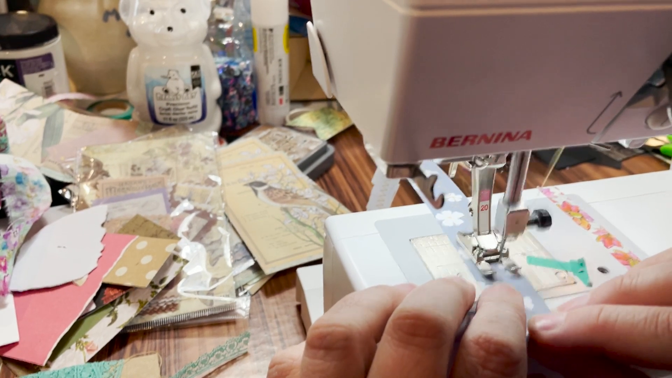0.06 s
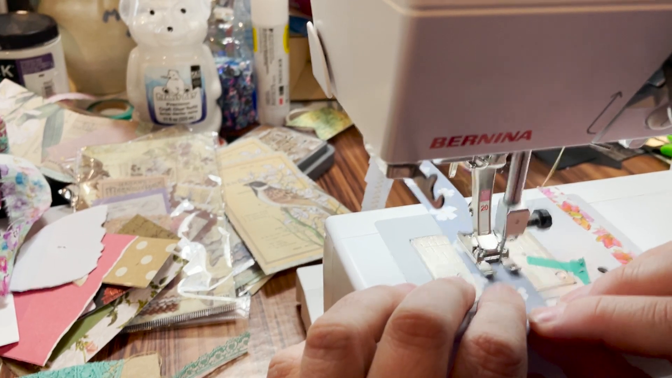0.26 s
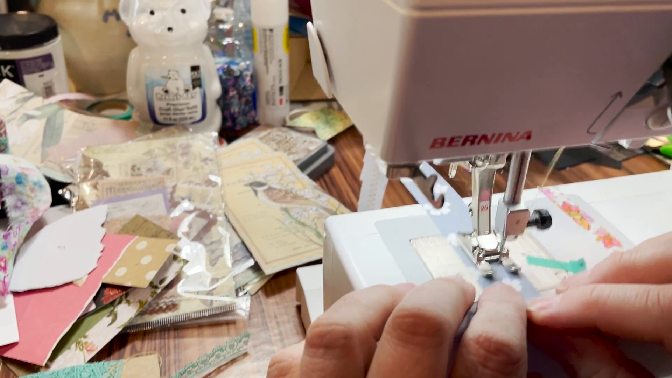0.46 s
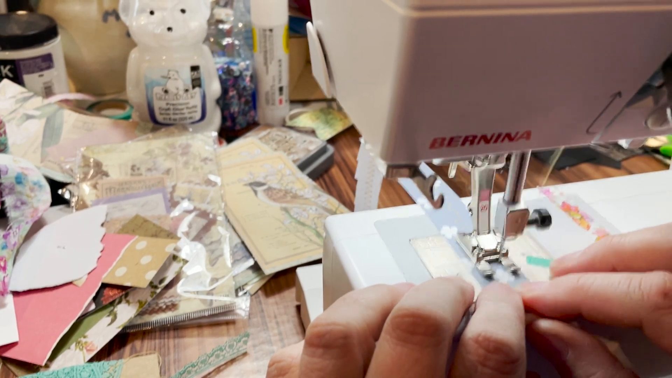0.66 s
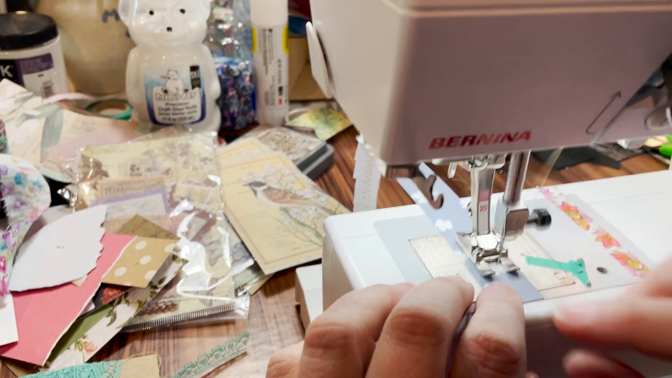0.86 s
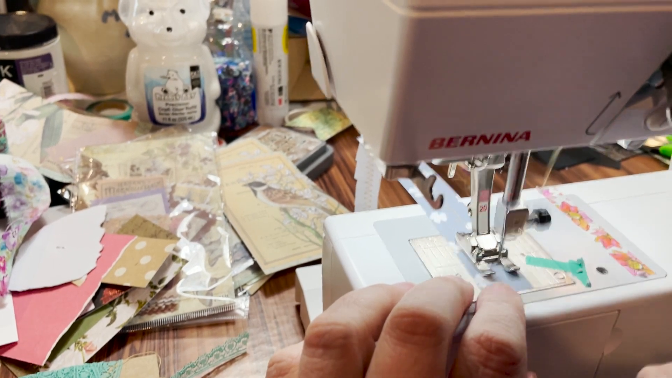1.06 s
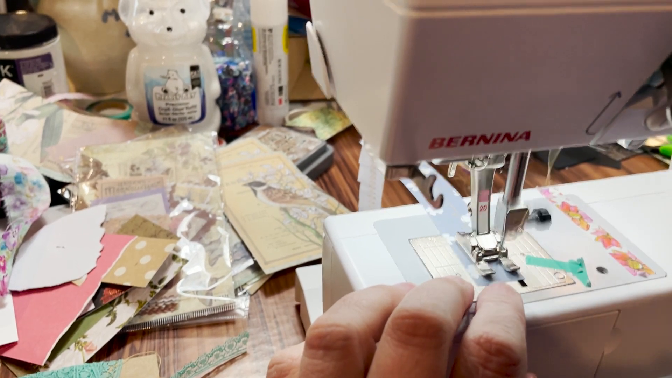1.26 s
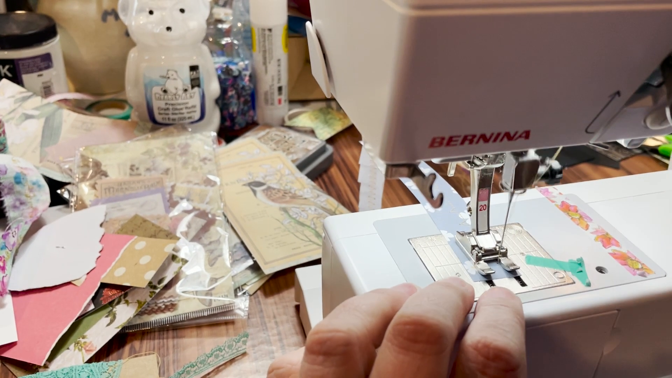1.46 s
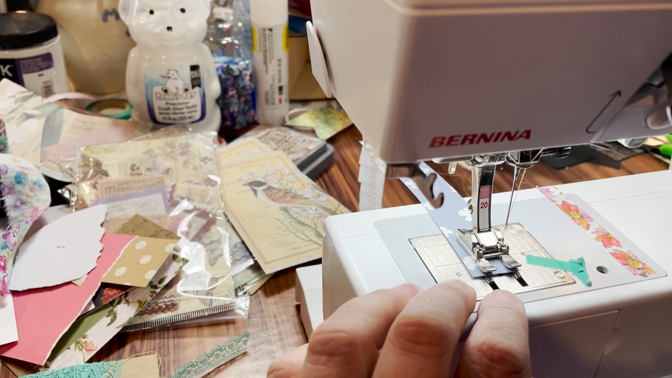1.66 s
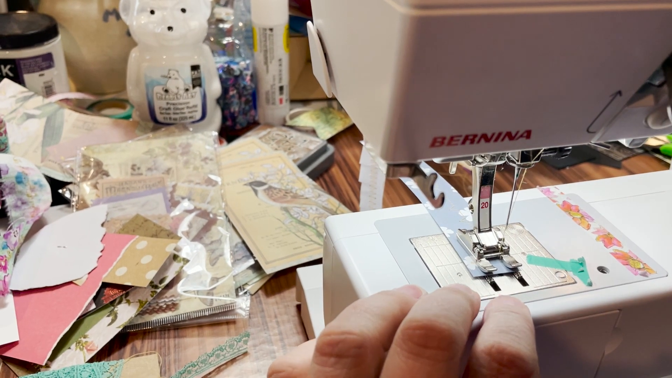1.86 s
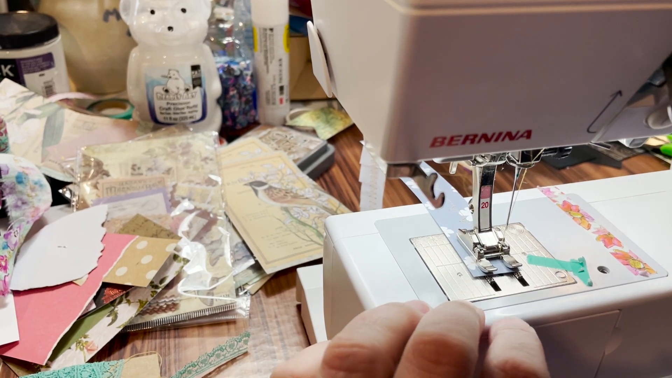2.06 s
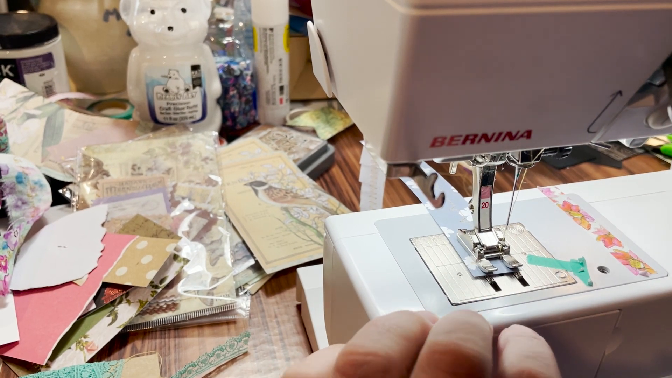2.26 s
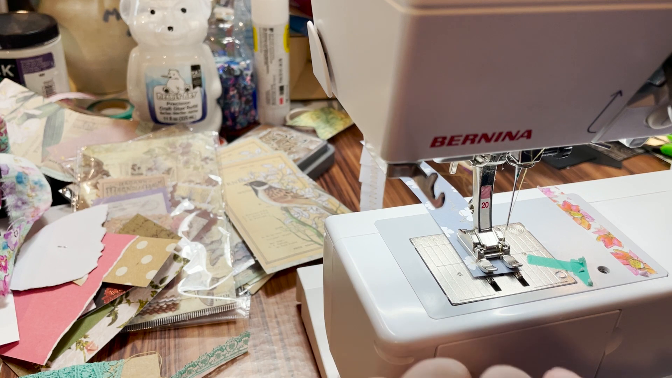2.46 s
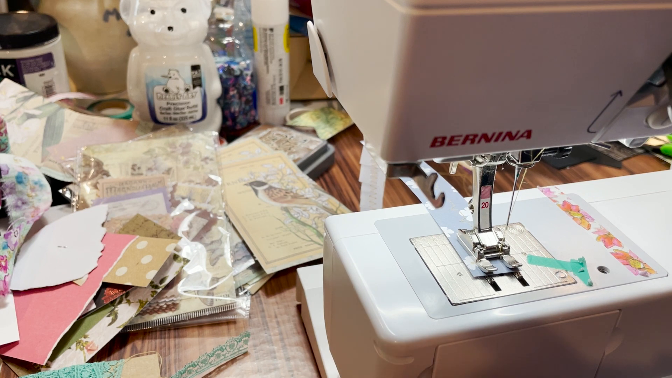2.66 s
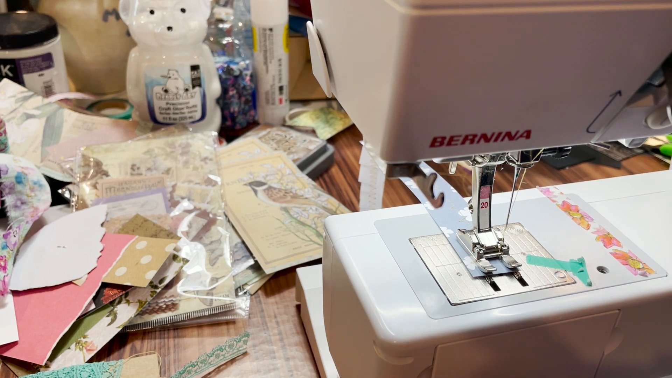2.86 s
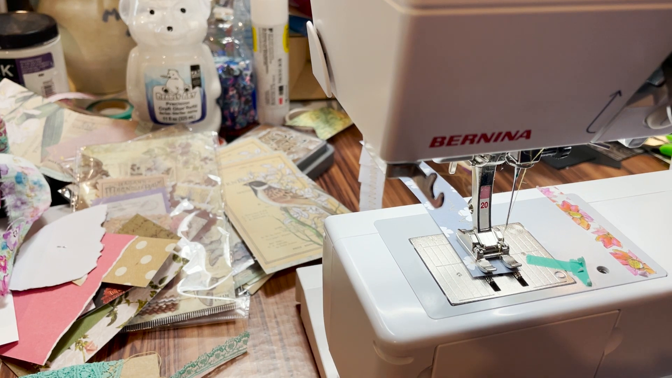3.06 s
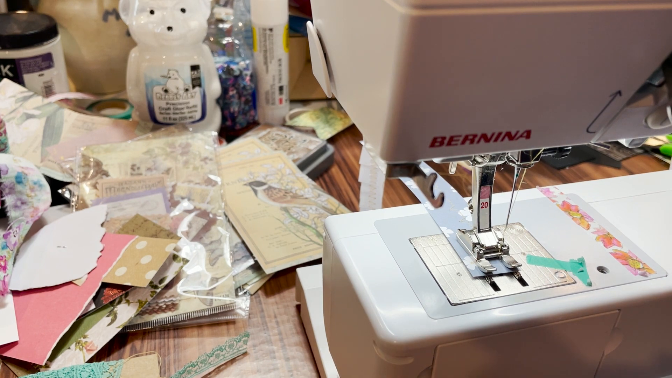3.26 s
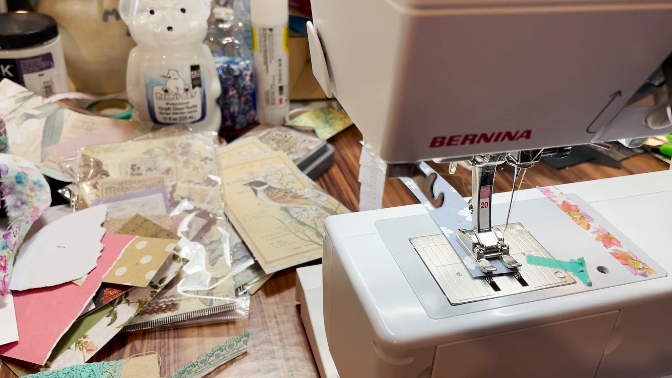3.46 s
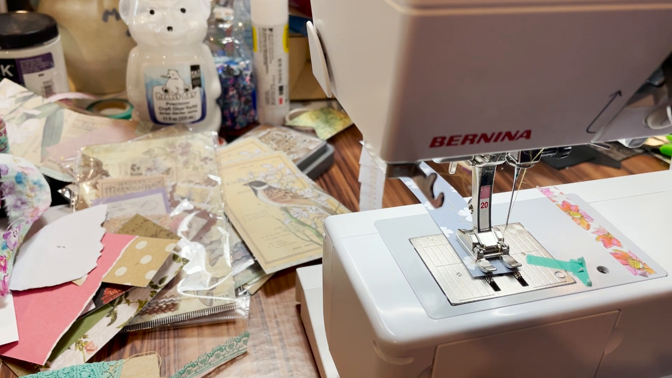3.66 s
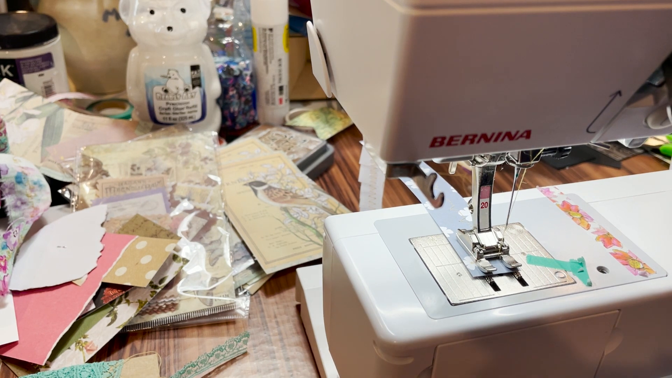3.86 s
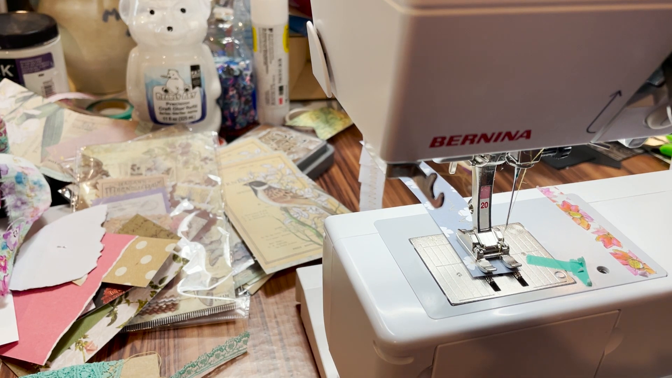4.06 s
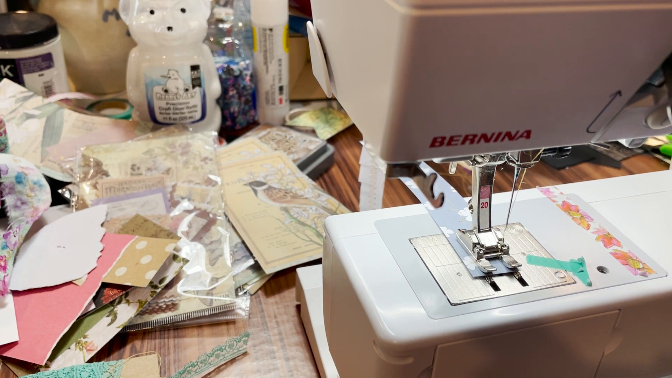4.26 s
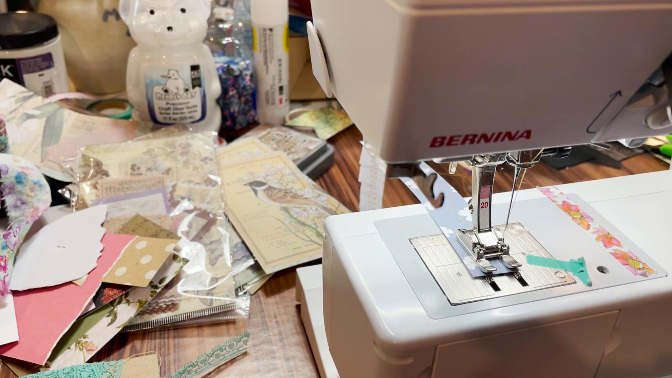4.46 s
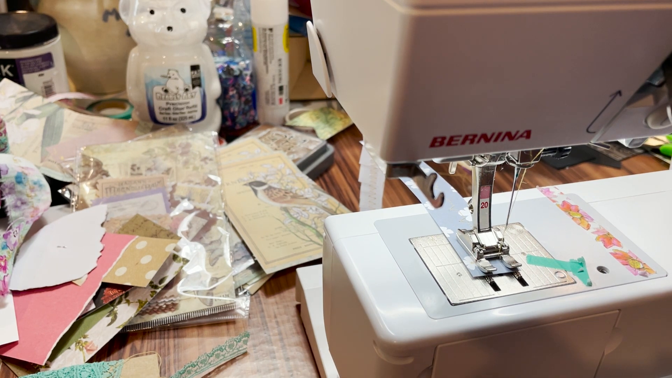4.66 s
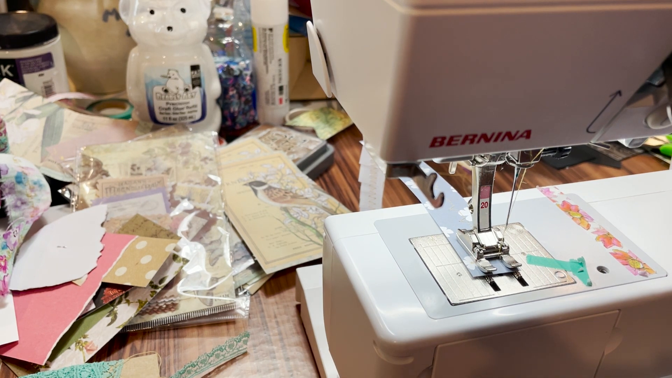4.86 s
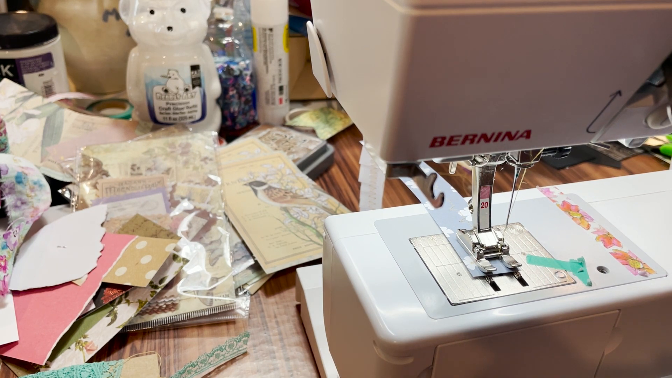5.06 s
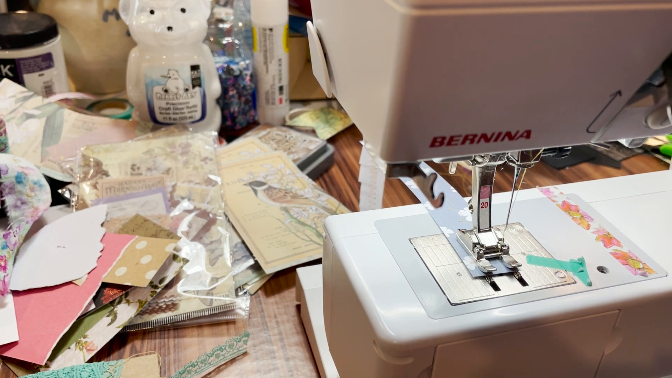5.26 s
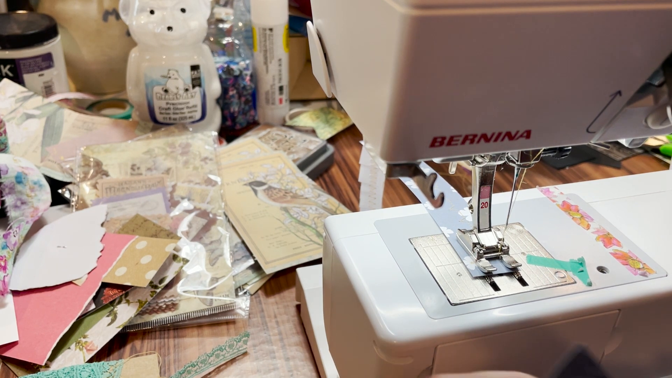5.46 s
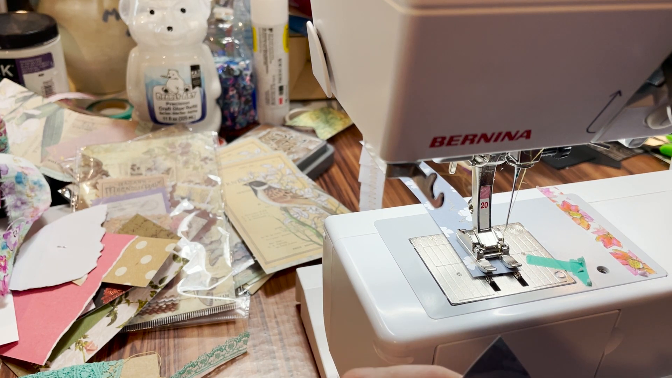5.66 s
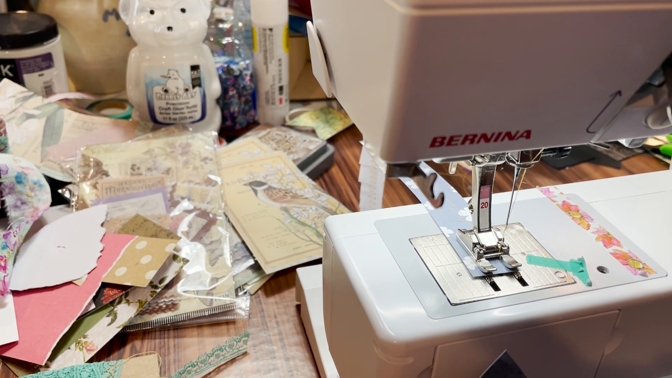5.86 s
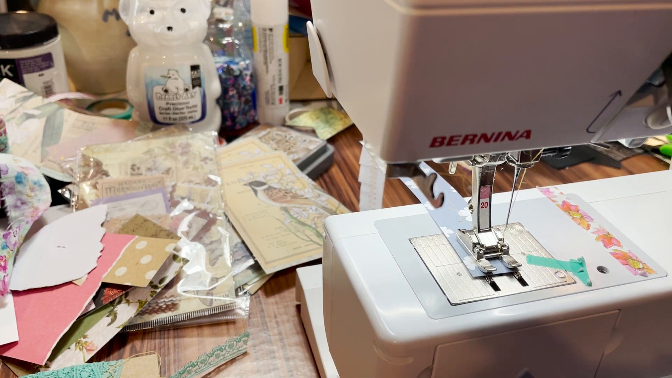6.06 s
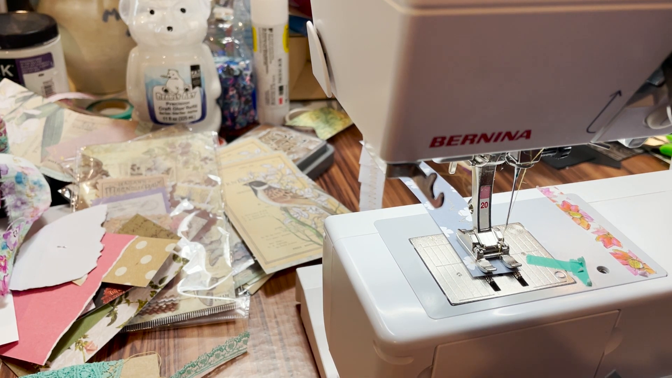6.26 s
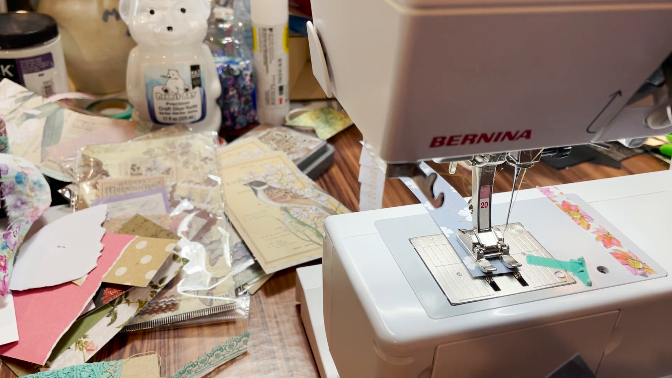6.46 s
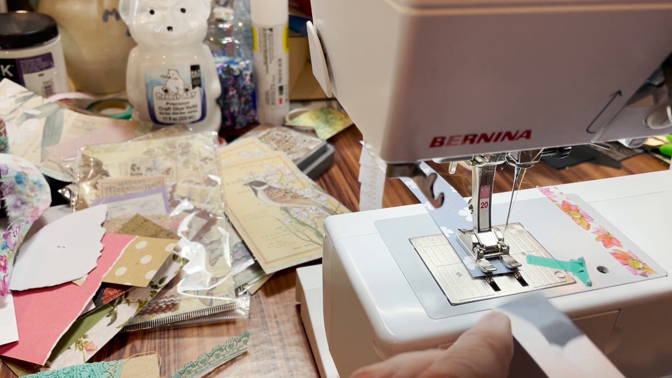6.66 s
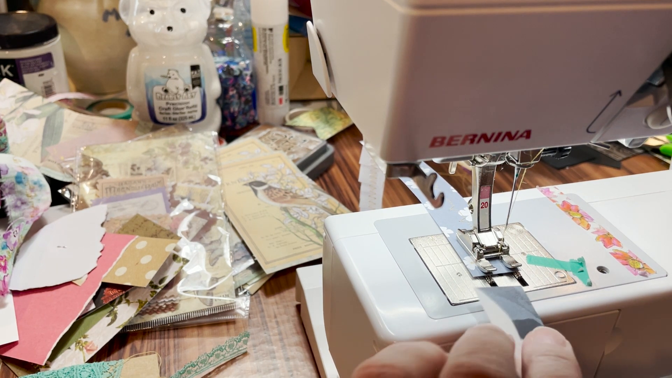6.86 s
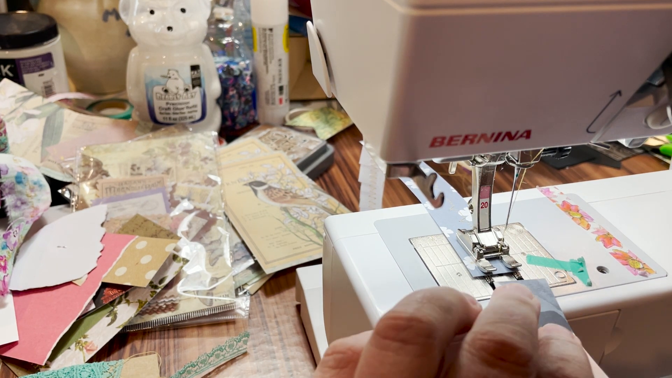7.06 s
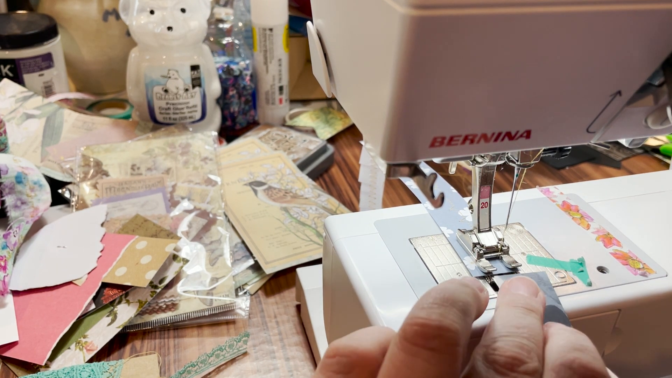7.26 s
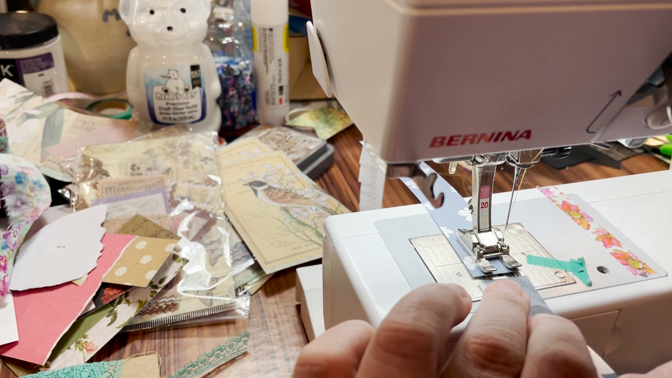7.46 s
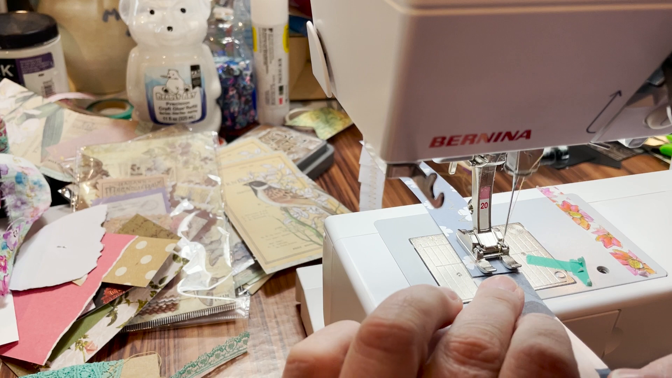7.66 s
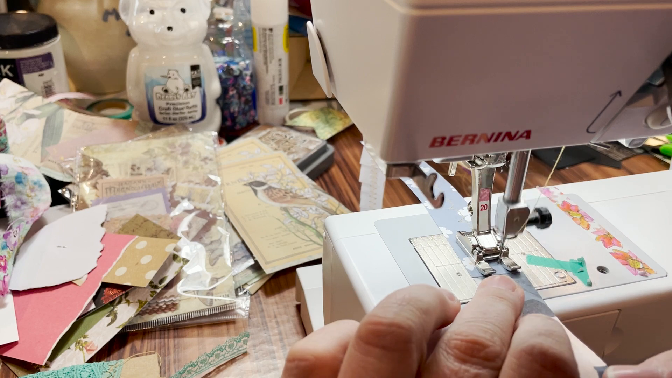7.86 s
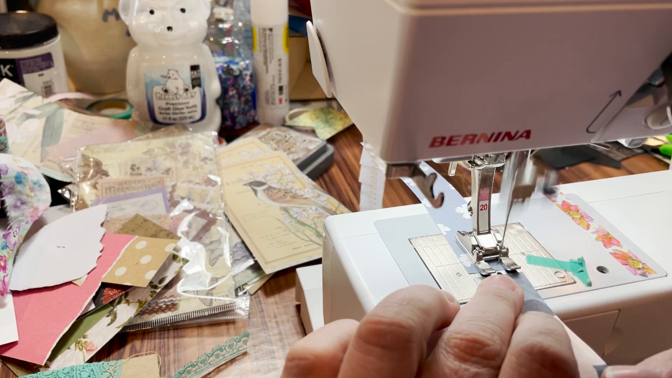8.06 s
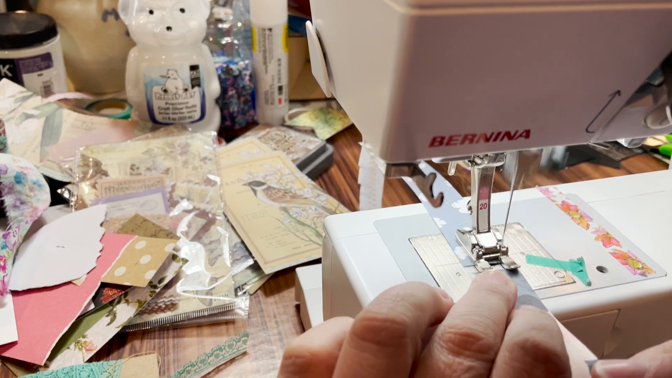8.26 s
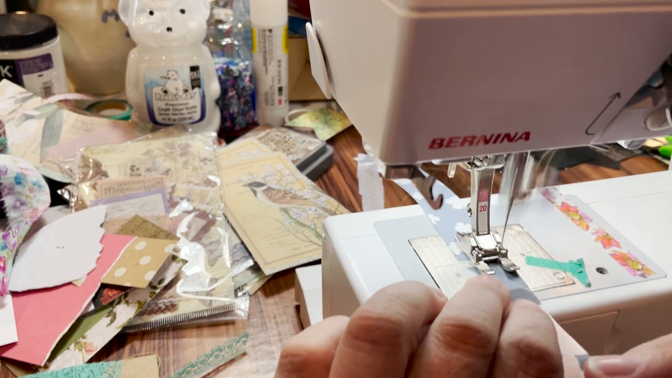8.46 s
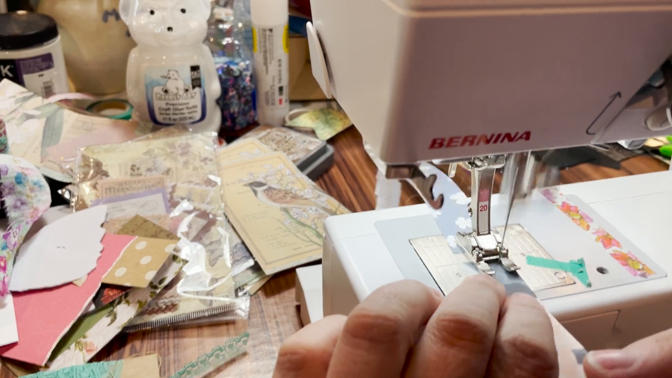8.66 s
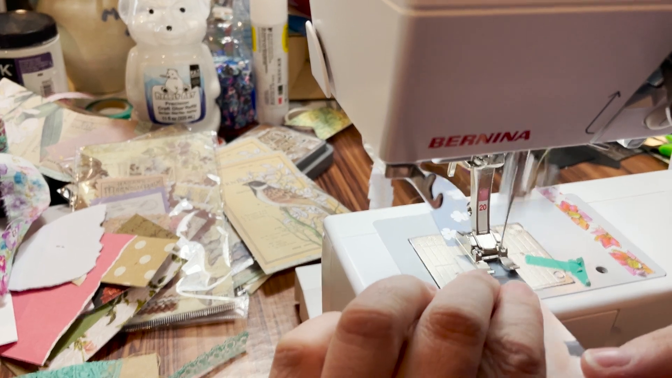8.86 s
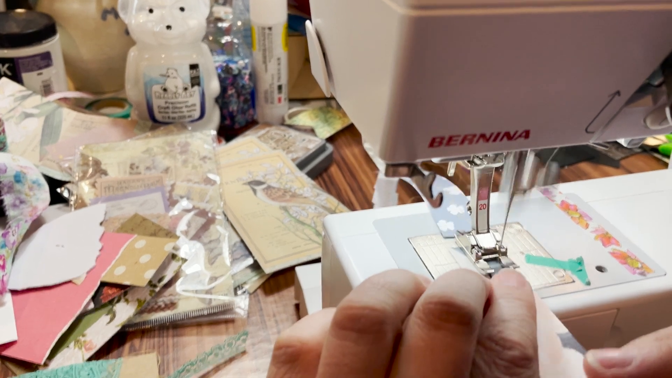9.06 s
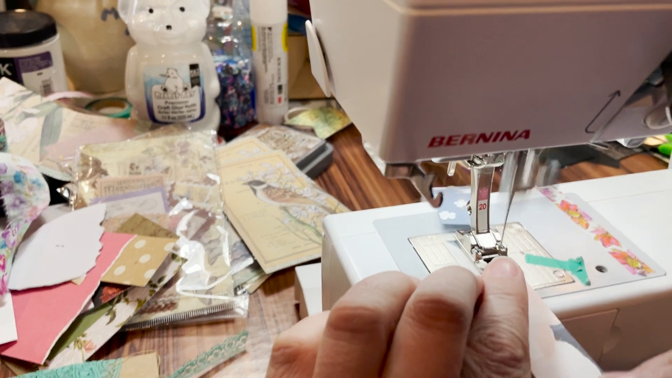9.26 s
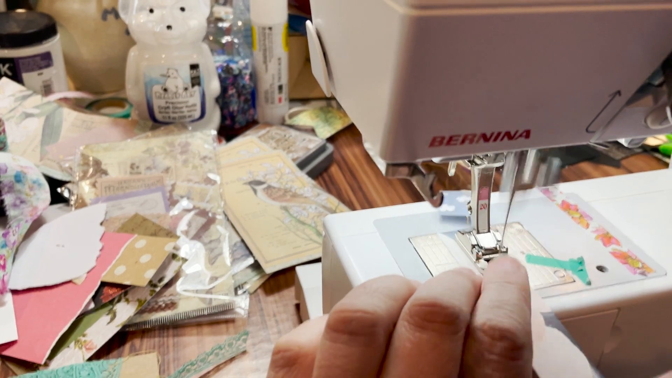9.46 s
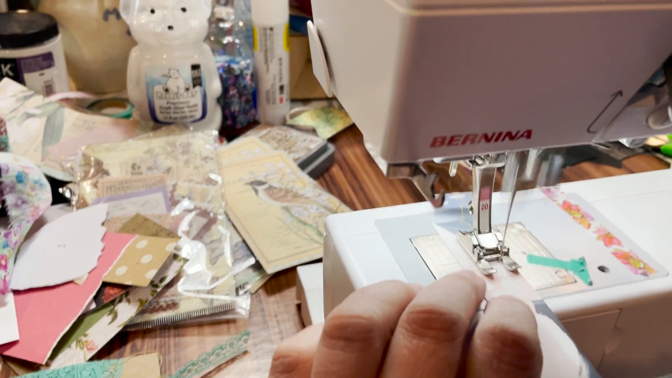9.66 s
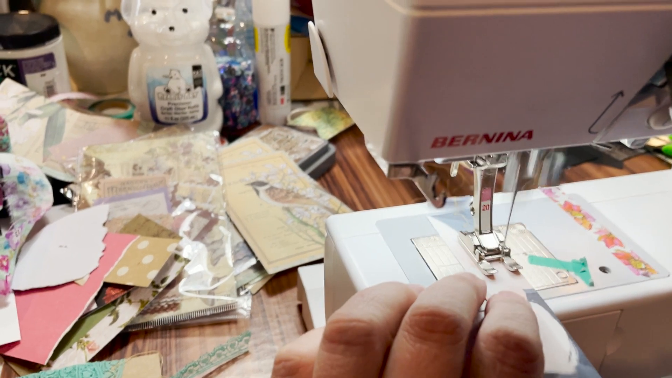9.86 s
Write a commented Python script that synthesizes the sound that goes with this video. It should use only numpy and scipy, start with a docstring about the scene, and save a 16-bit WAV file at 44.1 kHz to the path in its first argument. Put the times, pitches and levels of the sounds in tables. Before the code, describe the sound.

An electric sewing machine is running from the start, close by in a small, quiet room. It makes about fifteen stitches a second, with a droning body, metallic clatter, a rough motor whine and the crisp punch of the needle through paper. From about 1.2 seconds it slows, with a knock and a few loose clicks, stopping by 1.7 seconds as its springs ring faintly. A low room hum remains. Between 2 and 3.6 seconds fingers softly brush and slide paper. Around 5 seconds a strip is drawn out with a faint rasp. Light paper snaps and taps come between 6.3 and 7 seconds, the sharpest near 6.5 and 6.9. At about 7.6 seconds the machine creeps with quiet clicks, then accelerates from 7.9 with heavy knocks. By 8.4 seconds it is back at full speed, stitching loudly and evenly until the end, near 10 seconds.

```python
"""Close by, in a small quiet room, an electric sewing machine is stitching paper strips. Each turn of its
shaft repeats the same knocks, clatter and needle punch, in a pattern six stitches long.
After about a second it coasts to a stop: loose links catch and springs ring on.
In the pause, hands slide and tap paper, draw a strip out and feed a new one under the foot.
Near 8 s the machine creeps, picks up speed and sews on."""
import sys
import numpy as np
from scipy import signal
from scipy.fft import rfft, irfft, next_fast_len
from scipy.io import wavfile

SR = 44100
rng = np.random.default_rng(int(sys.argv[2]) if len(sys.argv) > 2 else 0)


def wrap_up_sound(samples):
    """Save the sound to the file named by the first command line argument, as 16-bit audio."""
    columns = np.atleast_2d(samples).T
    # keep every value between -1 and 1, then stretch to whole-number steps
    tamed = np.clip(columns, -1, 1)
    steps = np.round(tamed * 32767).astype(np.int16)
    wavfile.write(sys.argv[1], SR, steps)


N = 437031
TIME = np.arange(N) / SR
STITCHES_PER_S, PATTERN_STITCHES = 15.04, 6  # one stitch is one turn of the shaft


def amp(db):
    """Turns decibels into a gain."""
    return 10 ** (np.asarray(db) / 20)


def evened(x):
    """Scales a signal to an average power of 1."""
    return x / np.sqrt(np.mean(x ** 2) + 1e-20)


def read(points, hz):
    """Looks up a curve at any frequency."""
    f, value = np.transpose(points)
    return np.interp(np.log(hz + 1), np.log(f), value)


def add(mix, s, sound):
    """Mixes a stereo sound in at s seconds."""
    part = mix[:, max(round(s * SR), 0):][:, :sound.shape[1]]
    part += sound[:, :part.shape[1]]


def colour(x, spectrum, size=4096):
    """Gives a sound the lows and highs of a spectrum."""
    log_gain = np.log(amp(read(spectrum, abs(np.fft.fftfreq(size, 1 / SR)))))
    response = np.fft.ifft(np.exp(signal.hilbert(log_gain).conj())).real[:size // 2]
    return signal.oaconvolve(x, response[None] / np.linalg.norm(response), axes=1)[:, :x.shape[1]]


# the head start of the left microphone: f/Hz, lead/radians
LEFT_LEAD = [(900, 0), (5000, 1.3), (8600, 3.2), (11000, 5.2), (13200, 6.1)]
def pair(streams, alike):
    """Makes three signals stereo: both sides share the first, and each gets another above the bass."""
    count = streams.shape[1]
    size = next_fast_len(count)
    delay = np.exp(-1j * read(LEFT_LEAD, np.fft.rfftfreq(size, 1 / SR)))
    late = irfft(rfft(streams[0], size) * delay, size)[:count]
    own = signal.lfilter(*signal.butter(1, 350, "high", fs=SR), streams[1:])
    return np.sqrt(alike) * np.array([streams[0], late]) + np.sqrt(1 - alike) * own


def grit(count, spread_db):
    """Three streams of tiny hits of unequal size."""
    sizes = np.clip(rng.standard_normal(count // 16 + 1), -2, 2).repeat(16)[:count]
    return evened(rng.standard_normal((3, count)) * amp(spread_db * sizes))


def wander(count, hz):
    """Drifts to a new random value hz times a second."""
    knots = rng.standard_normal(int(count / SR * hz) + 2)
    return np.interp(np.arange(count) / SR * hz, np.arange(len(knots)), knots)


def ring(notes, rise_s=0.00044):
    """A part rings after one hit; each note drops 60 dB in its fade time."""
    t = TIME[:SR]
    tones = sum(amp(db - 60 * t / fade_s) * np.sin(2 * np.pi * hz * t) for hz, db, fade_s in notes)
    return np.minimum(t / rise_s, 1) * tones


def struck(turns, hits, notes, rise_s=0.00043):
    """Hits ring a part at nearly the same angles every turn."""
    force, slack = np.zeros(len(turns)), .009 * wander(len(turns), 60)
    for at, db in hits:
        force[1:] += amp(db) * np.diff(np.floor(turns + slack - at))
    force *= amp(2 * wander(len(turns), 20))
    return signal.oaconvolve(force, ring(notes, rise_s)[:SR // 4])[:len(turns)]


def shaft(creep_s, press_s, release_s, rest_s, pattern_s):
    """The shaft creeps, speeds up and brakes; it is louder when fast and as the motor takes the load."""
    creep_per_s, spin_up_s, brake_s, engage_s, settle_s = 2.7, .49, .29, .0093, .17
    t = TIME[(TIME >= creep_s) & (TIME < rest_s)]
    pressed = np.maximum(t - press_s, 0)
    spin_up = np.minimum(pressed / spin_up_s, 1) ** .68
    brake = np.cos(np.pi / 2 * np.clip((t - release_s) / brake_s, 0, 1)) ** 2
    rate = creep_per_s + (STITCHES_PER_S - creep_per_s) * spin_up * brake
    turns = np.cumsum(rate) / SR
    speed_db = 10.5 * np.log2(rate / STITCHES_PER_S)
    load_db = 8 * np.minimum(pressed / engage_s, 1) * np.exp(-pressed / .054)
    fade = np.minimum((t - creep_s) / engage_s, 1) * np.minimum((rest_s - t) / settle_s, 1) ** 2
    return t, rate, turns - np.interp(pattern_s, t, turns), fade * amp(speed_db + load_db)


# the links knocking on the casing: angle/turns, level/dB
KNOCKS = [(.036, 1), (.165, -4), (.325, -2), (.554, 2.7), (.716, -.5), (.947, -1.6)]
# the casing's ring: f/Hz, level/dB, fade/s
CASING_NOTES = [(196.4, -27.5, 0.28), (290, -29, 0.18), (349.6, -15.5, 0.088), (737.5, -21.5, 0.06)]
KNOCK_RISE_S, KNOCK_SIDES = 0.0027, amp([[-2], [2]])
def knocks(turns):
    """Separate knocks ring the casing."""
    return amp(-5) * struck(turns, KNOCKS, CASING_NOTES, KNOCK_RISE_S) * KNOCK_SIDES


# the casing's steady tones: pitch/cycles per turn, level/dB, left minus right/dB
DRONE_TONES = [(4, -46.5, -2), (12, -40, 2), (13, -38.5, 1), (17, -40, -5), (18, -40, -4), (20, -37.5, -11),
               (21, -37, -6), (22, -34, -9), (23, -34.5, -6), (24, -32.5, -6), (26, -31, -11),
               (27, -40, -8), (34, -43, 0), (39, -38, -5), (42, -39.5, -3), (49, -41.5, 3), (65, -42, 2)]
# their head start on the left: f/Hz, lead/radians
DRONE_LEAD = [(200, 0), (380, -.7), (520, .2), (740, 1), (880, 3.5), (980, 6.3)]
def drone(turns, waver_db=2.5, throb_db=3):
    """Fast knocks blend into wavering tones, which throb as the needle bar turns back."""
    at, knock_db = np.transpose(KNOCKS)
    turns = turns + .0033 * wander(len(turns), 45)  # the belt stretches and gives
    out = np.zeros((2, len(turns)))
    for cycles, db, pan_db in DRONE_TONES:
        phase = np.angle(np.sum(amp(knock_db) * np.exp(-2j * np.pi * cycles * at)))
        lead = read(DRONE_LEAD, cycles * STITCHES_PER_S) * np.array([[.5], [-.5]])
        sides = evened(amp([[pan_db / 2], [-pan_db / 2]]))
        waver = evened(amp(waver_db * wander(len(turns), 30)))
        out += np.sqrt(2) * amp(db) * sides * waver * np.cos(2 * np.pi * cycles * turns + phase + lead)
    return amp(throb_db * np.cos(2 * np.pi * (turns - .26))) * out


# strokes of needle bar, hook and feed: angle/turns, decay/turns, clatter/dB, hiss/dB
STROKES = [(.02, 0.078, 8, 0.5), (0.087, 0.051, 5, 8), (0.149, 0.045, 6, -6.5), (0.271, 0.075, 2, -12.5),
           (.53, 0.16, 3, 1.5), (0.702, 0.06, 5.5, -8), (0.802, 0.24, -2, -1), (.93, 0.066, -0.5, -0.5)]
def stroke_force(turns, part):
    """Each stroke starts a shaking that dies away within the turn."""
    angle, power = np.linspace(0, 1, num=1024), 0
    for at, decay, clatter_db, hiss_db in STROKES:
        db = clatter_db if part == "clatter" else hiss_db
        power += amp(db) ** 2 * np.exp(-((angle - at) % 1) / decay)
    return np.interp(turns % 1, angle, evened(np.sqrt(power)))


# the clatter's spectrum: f/Hz, level/dB
CLATTER = [(25, -29), (90, -10.5), (170, -2), (330, -4.5), (470, -1.5), (700, -1.5), (860, -4),
           (1060, -4.5), (1280, -1.5), (1550, -4.5), (1850, -8), (2700, -17.5), (4000, -15), (8000, -30)]
def clatter(turns, teeth, play_s=.00006):
    """Gears and cams touch at the same angles every turn, a little uneven in time and force."""
    count = teeth.shape[1]
    tooth = np.floor(turns * count).astype(int)
    at = np.flatnonzero(np.diff(tooth)) + 1
    push = stroke_force(turns[at], "clatter") * amp(wander(len(turns), 50))[at]
    force = (teeth[:, tooth[at] % count] + .8 * rng.standard_normal((3, len(at)))) * push
    slack = np.round(play_s * SR * rng.standard_normal(len(at))).astype(int)
    clicks = np.zeros((3, len(turns)))
    clicks[:, np.clip(at + slack, 0, len(turns) - 1)] = force
    sides = amp([[.83], [-.83]])
    return amp(-26) * sides * colour(pair(evened(clicks), alike=0.81), CLATTER)


# the needle bar's hits: angle/turns, level/dB
CLACKS = [(0.046, -2), (0.089, -2.5), (0.711, -7.5)]
BED_THUMP = [(.27, 0.0077)]
# the ring of the parts it hits: f/Hz, level/dB, fade/s
STEEL_NOTES = [(1823.5, -24, 0.051), (2280, -28, .065), (2923, -34.5, 0.055), (3830, -33.5, .045),
               (6263, -39, 0.032)]
BED_NOTES = [(734, -20, 0.057), (1268.5, -26, 0.098)]
def clacks(turns):
    """The needle bar clacks in its steel guides and thumps the bed, the machine's flat base."""
    steel = pair(np.array([struck(turns, CLACKS, STEEL_NOTES) for _ in range(3)]), alike=1)
    return steel + struck(turns, BED_THUMP, BED_NOTES)


# the spectrum of thread, needle and feed: f/Hz, level/dB
HISS = [(500, -25), (2000, -1), (3000, 1), (3900, 1.5), (5100, -9), (6400, 8), (8000, 0), (10500, 0),
        (13000, 2.5), (15500, -13)]
def needle(turns, punch_at=0.059, drag_at=0.63):
    """Thread and hook hiss; the needle punches the paper and the feed drags it, hardest once a pattern."""
    swing_db = 5 * np.cos(2 * np.pi * (turns + 0.17) / PATTERN_STITCHES)
    hiss = amp(-35 + 2 * wander(len(turns), 60)) * stroke_force(turns, "hiss")
    since = (turns - punch_at) % 1
    punch = amp(-22 + swing_db) * np.exp(-since / .035) * np.minimum(since / .009, 1)
    drag = amp(-39 + swing_db) * np.exp(-((turns % 1 - drag_at) / .19) ** 2)
    force = np.sqrt(hiss ** 2 + punch ** 2 + drag ** 2)
    return colour(force * pair(grit(len(turns), spread_db=3.5), alike=0.91), HISS)


# the ring of the motor's panels: f/Hz, level/dB, fade/s
PANEL_NOTES = [(1040, -30, .06), (1250, -32, .05)]
def whine(turns, cycles_per_turn=142, rough_db=4):
    """The motor's rough whine makes each panel groan as it passes that panel's note."""
    flutter = 1.2 * wander(len(turns), 220)
    level = amp(-33 + rough_db * wander(len(turns), 120))
    tone = level * np.sin(2 * np.pi * cycles_per_turn * turns + flutter)
    return signal.oaconvolve(tone, ring(PANEL_NOTES))[:len(turns)]


# the two runs, the first already under way: creep/s, pedal down/s, pedal up/s, stop/s, pattern start/s
RUNS = [(-1, -1, 1.18, 1.72, .3686), (7.63, 7.91, 11, 12, 9.028)]
def machine(merge_hz=13.8, merge_width_hz=0.66):
    """One shaft drives every part; near full speed the knocks mostly merge into a drone."""
    out, teeth = np.zeros((2, N)), rng.choice([-1., 1.], size=(3, 400))
    for run in RUNS:
        t, rate, turns, drive = shaft(*run)
        merged = np.clip(.5 + .5 * (rate - merge_hz) / merge_width_hz, 0, .95)
        body = np.sqrt(merged) * drone(turns) + np.sqrt(1 - merged) * knocks(turns)
        parts = body + clatter(turns, teeth) + clacks(turns) + needle(turns) + whine(turns)
        add(out, t[0], drive * parts)
    return out


# the murmur's spectrum: f/Hz, level/dB
MURMUR = [(25, -13.5), (55, 0), (90, -1.5), (130, -1), (190, -12.5), (260, -4.5), (400, -17.5), (600, -27),
          (3000, -41), (8000, -44.5)]
# its loudness: t/s, level/dB
MURMUR_LEVEL = [(1.8, -59.5), (2.8, -57.5), (3.8, -66.5), (6.4, -62.5), (7.6, -65)]
def murmur():
    """The house murmurs low under everything, swelling and sinking."""
    s, db = np.transpose(MURMUR_LEVEL)
    return amp(np.interp(TIME, s, db)) * colour(pair(rng.standard_normal((3, N)), alike=0.32), MURMUR)


def echo(x, fade_s, level_db):
    """The table and cluttered walls scatter a short echo with little bass."""
    t = TIME[:SR // 3]
    bounces = rng.standard_normal((2, len(t))) * (t > .003) * amp(-60 * t / fade_s)
    tail = signal.lfilter(*signal.butter(2, [600, 7000], "band", fs=SR), bounces)
    return amp(level_db) * signal.oaconvolve(x, tail / np.linalg.norm(tail[0]), axes=1)[:, :N]


# knocks while braking or speeding up: t/s, level/dB
HEAVY_KNOCKS = [(1.328, -3.5), (7.945, -8.5), (8.014, -2), (8.084, -7.5), (8.134, 0.5), (8.18, -4),
                (8.227, 1), (8.271, 0), (8.305, -5), (8.372, 3)]
def heavy_knocks():
    """While the speed changes, the needle bar knocks the casing as it turns back."""
    out, boom = np.zeros((2, N)), ring(CASING_NOTES, KNOCK_RISE_S) * KNOCK_SIDES
    for s, db in HEAVY_KNOCKS:
        add(out, s, amp(db) * boom)
    return out


# when the shaft creeps: start/s, end/s, level/dB
CREEPS = [(1.361, 1.688, -43), (7.633, 7.946, -49)]
# the gears' spectrum: f/Hz, level/dB
GEARS = [(60, -6), (260, 2.5), (1500, -10.5), (4000, -40)]
def gears():
    """With the motor idle, the gears roll with a low, grainy rumble."""
    out = np.zeros((2, N))
    for start, end, db in CREEPS:
        count = round((end - start) * SR)
        rolling = pair(grit(count, spread_db=4.5), alike=0.73) * signal.windows.tukey(count, .08)
        add(out, start, amp(db) * colour(rolling, GEARS))
    return out


# the spectra of a blow's three parts: f/Hz, level/dB
THUD = [(50, -49), (170, 3.5), (550, -5), (1000, -11), (3000, -34)]
CLACK = [(300, -51), (800, 3), (1400, 5.5), (2600, -1.5), (5000, -17)]
TICK = [(1200, -12.5), (3300, 2), (5500, 0.5), (9000, -3), (13000, 2.5), (16000, -11)]
def blows(rows, decays_s, gains_db, rise_s):
    """Each blow is a low thud, a clack and a bright tick; harder means less thud and more tick."""
    out, t = np.zeros((2, N)), TIME[:SR // 6]
    for s, level_db, hardness_db in rows:
        for tilt, gain_db, decay, spectrum in zip((-1, 0, 1), gains_db, decays_s, (THUD, CLACK, TICK)):
            shape = np.exp(-t / decay) * (1 - np.exp(-(t / rise_s) ** 2))
            burst = shape * pair(grit(len(t), spread_db=3.5), alike=0.89)
            add(out, s, amp(level_db + tilt * hardness_db + gain_db) * colour(burst, spectrum))
    return out


# links catching: t/s, level/dB, hardness/dB
CATCHES = [(1.42, -34, 5), (1.533, -38, 6), (1.654, -47.5, 0), (7.636, -48, -12.5), (7.732, -51, -2.5),
           (7.809, -50, -1.5), (7.864, -40.5, -4), (7.94, -32, -5.5), (8.052, -30.5, -3.5),
           (8.166, -30, 2.5)]
def loose_links():
    """Loose links catch while the shaft turns slowly."""
    return blows(CATCHES, decays_s=(.022, .016, .012), gains_db=(0, 1, 0), rise_s=0.0046)


def rubbing(strokes, spectrum, gain_db, spread_db):
    """Paper fibres catch and let go; the echo off a hand moving away adds a hollow, falling note."""
    fibres, out = colour(pair(grit(N, spread_db), alike=0.7), spectrum), np.zeros((2, N))
    treble = signal.filtfilt(*signal.butter(2, 7200, "high", fs=SR), fibres)
    for start, length, db, swell_db, bright_db, hollow_hz in strokes:
        t = TIME[:round(length * SR) + SR // 8]
        at, along = round(start * SR) + np.arange(len(t)), np.minimum(t / length, 1)
        shape = np.minimum(t / (.0041 + .08 * length), 1) * np.exp(-np.maximum(t - length, 0) / .012)
        grip_db = .9 * wander(len(t), 50)
        pressure = amp(gain_db + db + swell_db * (along - .5) + grip_db)
        direct = fibres[:, at] + (amp(bright_db) - 1) * treble[:, at]
        delay_s = (1 + .045 * along) / hollow_hz
        bounced = np.array([np.interp(t - delay_s, t, side) for side in direct])
        add(out, start, shape * pressure * (direct + .6 * bounced))
    return out


# paper moves: t/s, length/s, level/dB, swell/dB, brightness/dB, hollow note/Hz
SLIDES = [(1.55, 0.055, -56, 17, 1, 1980), (2.09, 0.021, -67, -3, -16, 3500),
          (2.49, 0.12, -70.5, -3, -8, 3780), (2.568, 0.0095, -50.5, -9, -11, 3700),
          (2.88, 0.16, -60, -4, -5, 3780), (3.13, 0.43, -66.5, -5, -12, 3940),
          (3.582, 0.012, -63, 5, 2, 3580), (4.8, 0.11, -69.5, 10, 8, 2370),
          (4.9, 0.5, -66, 14.5, 5.5, 2390), (6.095, 0.18, -76, -11, -3, 2000),
          (6.27, 0.034, -63.5, -2, 1, 1950), (6.36, 0.058, -62.5, -6, 2, 1950),
          (6.44, 0.046, -59, 20, 2, 2020), (6.5, 0.276, -71.5, 10, 2.5, 3550),
          (6.83, 0.24, -67, -6, 3.5, 3500), (7.14, 0.44, -73.5, -1.5, 4, 3550)]
# their spectrum: f/Hz, level/dB
PAPER = [(400, -47), (1200, 1), (2300, -7.5), (3050, -2.5), (6000, -2), (13000, 0.5), (16000, -12.5)]
def slides():
    """Paper slides over the table and the needle plate."""
    return rubbing(SLIDES, PAPER, gain_db=2, spread_db=3)


# the ring of springs and rods: f/Hz, level/dB, fade/s
SPRING_NOTES = [(245, -55.5, 0.93), (375, -58, 0.93), (500, -64.5, 1.1), (1082, -62.5, 1.1)]
def springs(start_s=1.66):
    """Springs and rods ring on after the stop."""
    out = np.zeros((2, N))
    add(out, start_s, np.tile(ring(SPRING_NOTES), (2, 1)))
    return out


# snaps and taps: t/s, level/dB, hardness/dB
TAPS = [(1.853, -75, 8), (5.425, -60.5, 7.5), (5.554, -64, 7), (6.269, -58, 3), (6.278, -73.5, -27.5),
        (6.378, -58, -2), (6.496, -45.5, 7), (6.516, -47.5, 7.5), (6.586, -53.5, 0), (6.646, -56.5, 5),
        (6.893, -45, 10.5), (6.993, -56, 7), (7.0, -49.5, 12.5), (7.352, -77, -25.5)]
def taps():
    """Paper snaps and fingers tap, from soft pats to hard ticks."""
    return blows(TAPS, decays_s=(.012, .006, .0012), gains_db=(3, 6, 13), rise_s=0.00056)


# finger moves: t/s, length/s, level/dB, swell/dB, brightness/dB, hollow note/Hz
BRUSHES = [(2.39, 0.036, -58, -4, -8, 1220), (2.3, 0.42, -64.5, 5, -1, 1770),
           (2.765, 0.19, -61, -14, -5, 1360), (6.5, 0.37, -67, -16, 0, 1690),
           (7.35, 0.23, -67, -14, -11, 1420)]
# their spectrum: f/Hz, level/dB
RUSTLE = [(200, 1.5), (450, 3.5), (750, 1.5), (1400, -6), (2200, -11.5), (4000, -17.5), (8000, -18),
          (16000, -34)]
def brushes():
    """Fingers brush and press the paper."""
    return rubbing(BRUSHES, RUSTLE, gain_db=-1.5, spread_db=5.5)


def strip_pull(start_s=4.9, end_s=5.44, from_hz=2100, to_hz=1200, width_hz=300):
    """A strip is drawn out; its rough note falls and swells as the free length grows."""
    count = round((end_s - start_s) * SR)
    glide = np.exp(2j * np.pi * np.cumsum(np.linspace(from_hz, to_hz, count)) / SR)
    friction = grit(count, spread_db=4) + 1j * grit(count, spread_db=5)
    pole = np.exp(-np.pi * width_hz / SR)
    fuzz = signal.lfilter([1], [1, -2 * pole, pole * pole], friction)  # a narrow band of noise
    swell = amp(np.linspace(-93, -78, count)) * signal.windows.tukey(count, .1)
    out = np.zeros((2, N))
    add(out, start_s, swell * pair(evened((fuzz * glide).real), alike=0.86))
    return out


# the flick's brief ring: f/Hz, level/dB, fade/s
FLICK_NOTES = [(1770, -29.5, 0.0094), (3300, -19, 0.0069), (3810, -18, 0.009)]
def flick(start_s=6.497):
    """The strip's edge flicks against the plate."""
    out = np.zeros((2, N))
    add(out, start_s, np.tile(ring(FLICK_NOTES), (2, 1)))
    return out


def scene():
    """The machine, the hands and the room."""
    small = loose_links() + taps() + slides() + brushes() + strip_pull() + springs()
    sewing = machine() + heavy_knocks() + gears()
    echoes = echo(sewing, fade_s=0.095, level_db=-15) + echo(small, fade_s=0.17, level_db=-12)
    return sewing + small + echoes + flick() + murmur()


def record(dry, top_hz=16100):
    """Cuts off the very highest treble."""
    return signal.oaconvolve(dry, signal.firwin(511, top_hz, window=("kaiser", 9), fs=SR)[None], "same")


dry = scene()
out = record(dry)
wrap_up_sound(out)
```